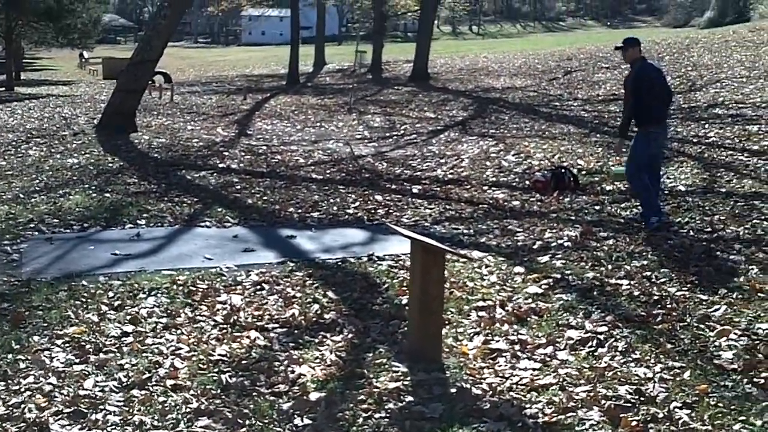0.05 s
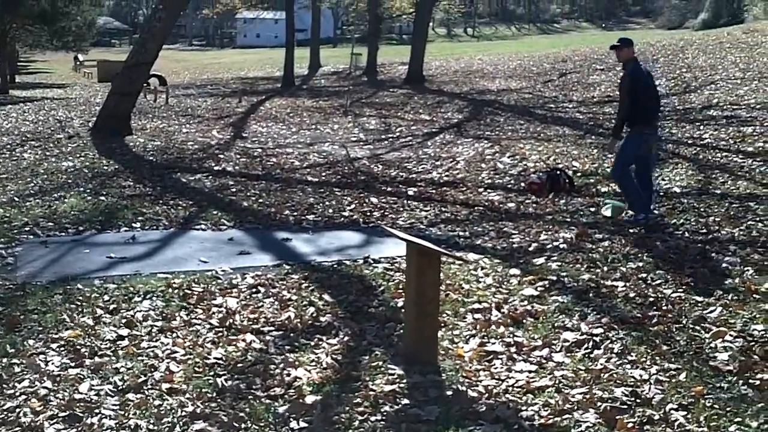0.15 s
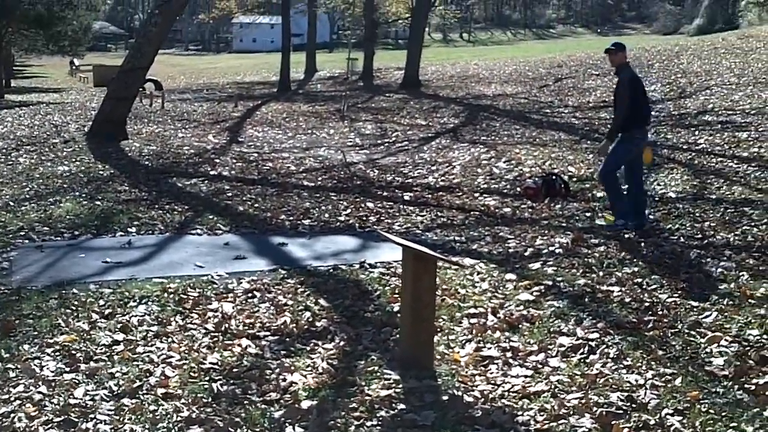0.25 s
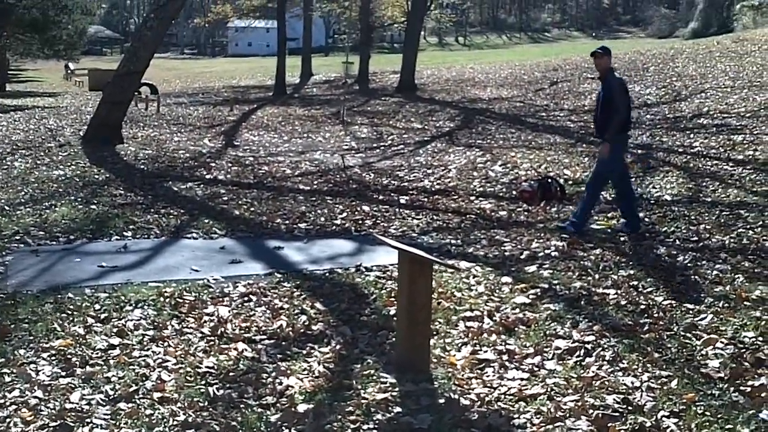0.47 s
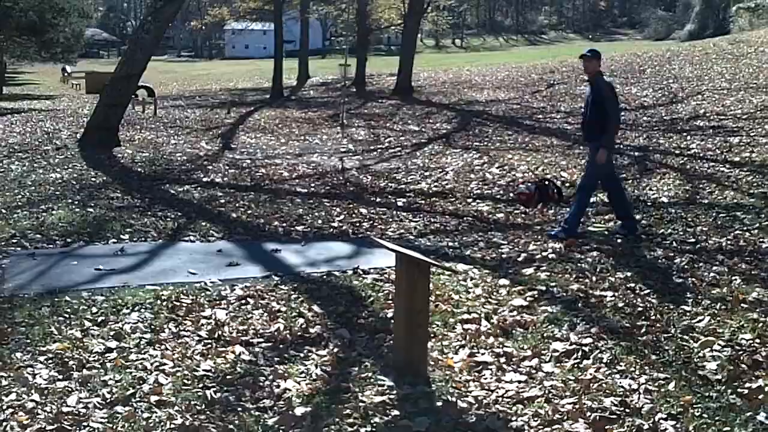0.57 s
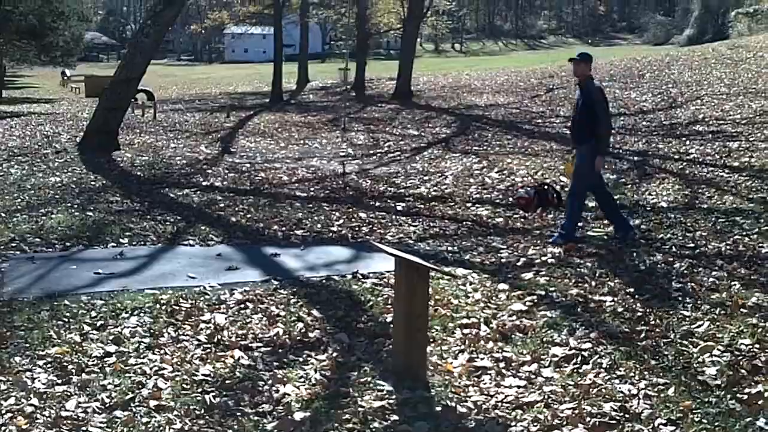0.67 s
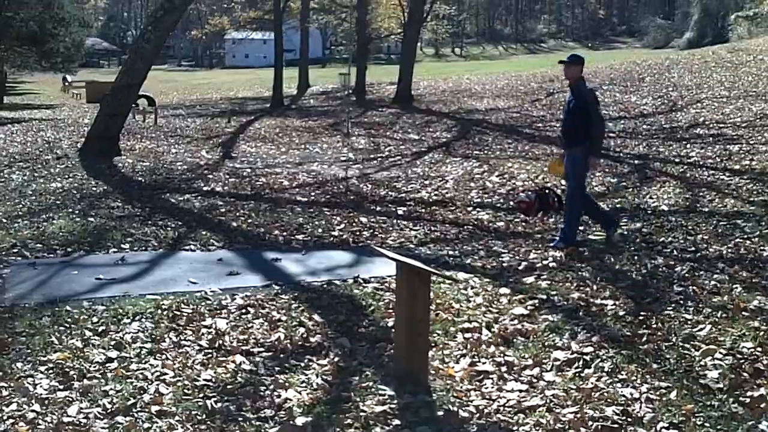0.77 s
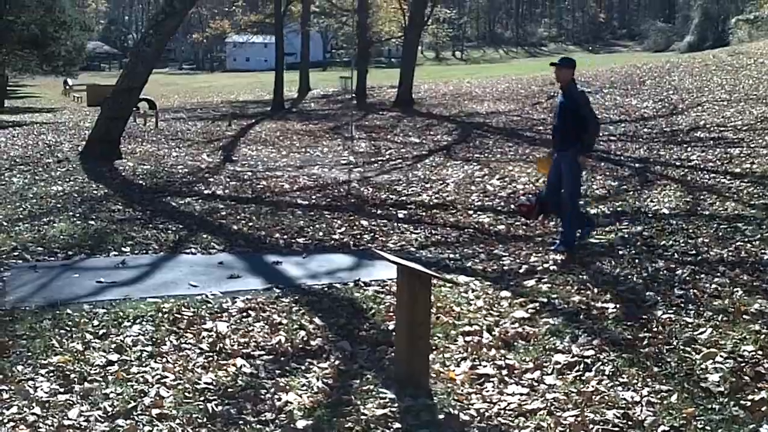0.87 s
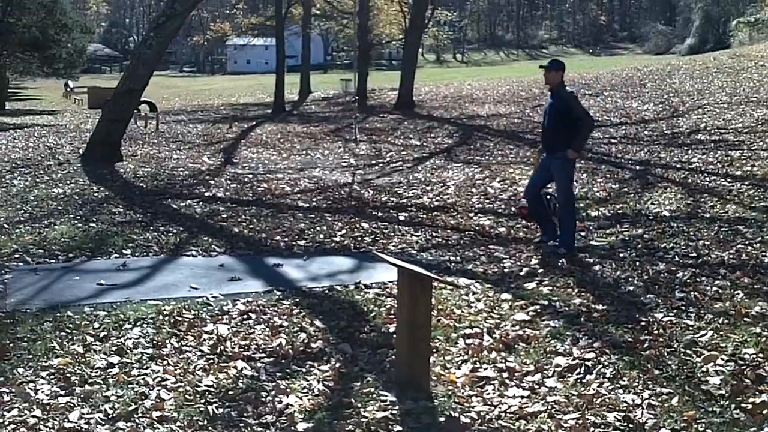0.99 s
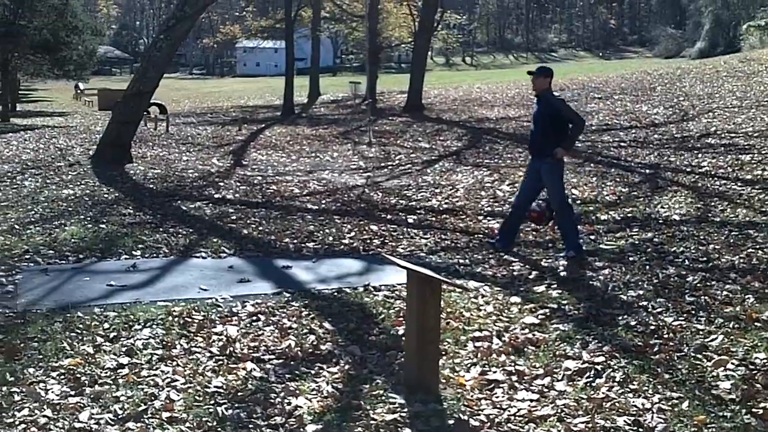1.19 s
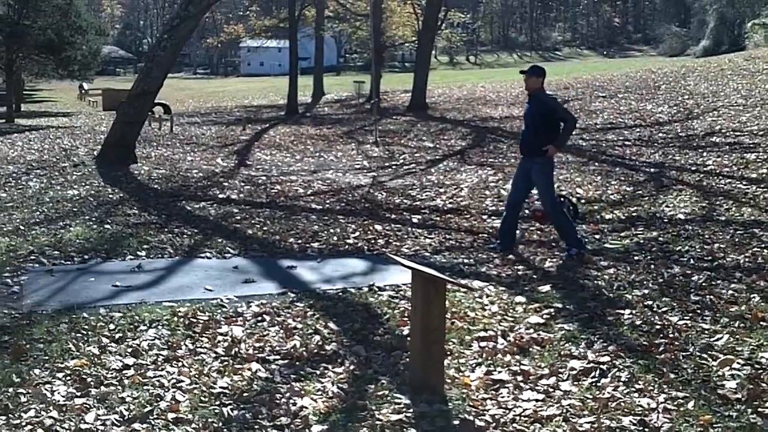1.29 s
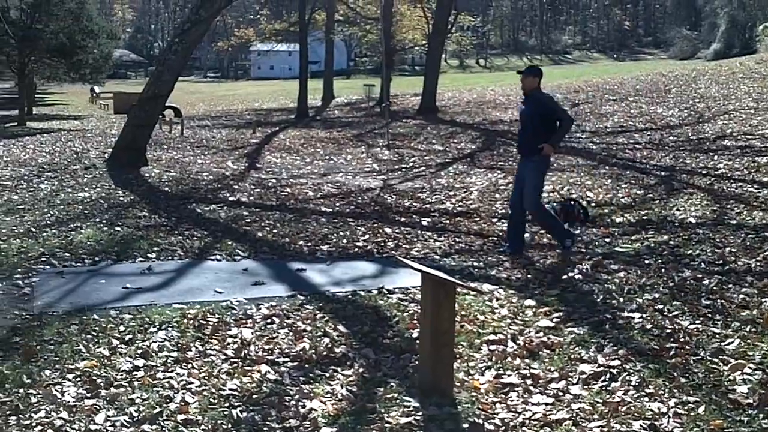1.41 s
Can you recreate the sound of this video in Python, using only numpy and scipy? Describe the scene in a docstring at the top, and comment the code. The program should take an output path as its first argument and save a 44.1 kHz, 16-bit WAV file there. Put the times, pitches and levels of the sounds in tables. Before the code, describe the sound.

One sharp knock on wood outdoors, followed by faint footsteps in dry leaves.

```python
"""Knock on wood in a park

A hard object hits wood: a graze, two sharp blows 10 ms apart, a short chatter, a soft last tap. Each contact
rings the wood's modes and adds a crack; the trees throw the sound back. Someone walks through dry leaves. Under
it all, the park hisses faintly and light wind rumbles on the microphone; the recorder cuts four narrow notches
into the treble."""
import sys
import numpy as np
from scipy import signal
from scipy.fft import rfft, irfft
from scipy.io import wavfile

SR = 44100
rng = np.random.default_rng(int(sys.argv[2]) if len(sys.argv) > 2 else 0)


def digitize_waveform(pressure):
    """Quantize a signal to 16-bit integers and store it at the path in sys.argv[1].

    Rows of a 2-D input are taken as channels; values are limited to [-1, 1].
    """
    field = np.atleast_2d(pressure).T
    bounded = np.clip(field, -1, 1)
    quanta = np.round(bounded * 32767).astype(np.int16)
    wavfile.write(sys.argv[1], SR, quanta)


N = 63945
T = np.arange(N) / SR


def from_db(db):
    """Decibels to gain."""
    return 10 ** (np.asarray(db) / 20)


def colour(x, spectrum):
    """Shape x by a spectrum of relative levels; rms 1."""
    hz, db = np.transpose(spectrum)
    bins_hz = np.maximum(np.arange(N // 2 + 1) * SR / N, 1)
    gain = from_db(np.interp(np.log(bins_hz), np.log(hz), db))
    shaped = irfft(rfft(x) * gain, N)
    return shaped / np.sqrt(np.mean(shaped ** 2))


def noise(spectrum):
    """Coloured noise, rms 1."""
    return colour(rng.standard_normal(N), spectrum)


def band(x, low_hz, high_hz):
    """Causal high-pass, then low-pass; both second order."""
    for hz, kind in (low_hz, "high"), (high_hz, "low"):
        x = signal.sosfilt(signal.butter(2, hz, kind, fs=SR, output="sos"), x + 1e-18)
    return x


def decay(start_s, t60_s):
    """Sudden onset, exponential decay."""
    return (T >= start_s) * np.exp(-np.log(1000) * np.maximum(T - start_s, 0) / t60_s)


def delayed(x, delay_s):
    """x, later by delay_s."""
    return np.interp(T - delay_s, T, x, left=0)


def swells(rows):
    """Envelope of asymmetric Gaussian bells, summed in power."""
    power = 0
    for peak_s, rise_s, fall_s, db in rows:
        width_s = np.where(T < peak_s, rise_s, fall_s)
        bell = from_db(db) * np.exp(-0.5 * ((T - peak_s) / width_s) ** 2)
        power += bell ** 2
    return np.sqrt(power)


# Park air spectrum: f/Hz, level/dB
AIR_SPECTRUM = [(100, 8), (250, 4.5), (450, -1), (1000, -2), (2000, -6.5), (3300, -8.5), (4600, -8),
                (6500, -16), (8000, -21.5), (10000, -24.5), (14000, -25.5), (16000, -18)]

def air(level_db=-57):
    """Steady far hiss of the park."""
    return from_db(level_db) * noise(AIR_SPECTRUM)


# Gust envelope: t/s, level/dB
GUSTS = [(0.0, -51), (0.024, -47.5), (0.666, -48), (0.746, -51), (0.782, -56), (0.984, -48), (1.054, -56.5),
         (1.106, -44.5), (1.194, -60.5), (1.324, -44), (1.396, -52.5), (1.45, -45)]
# Wind spectrum: f/Hz, level/dB
WIND_SPECTRUM = [(10, -1.5), (25, 6), (45, -2.5), (70, -3), (100, -12.5), (160, -40), (400, -56),
                 (2000, -83)]

def wind(gain_db=1):
    """Wind on the microphone: low rumble that follows the gusts."""
    gust_db = np.interp(T, *np.transpose(GUSTS))
    return from_db(gain_db + gust_db) * noise(WIND_SPECTRUM)


# Scuff swells: peak t/s, rise/s, fall/s, level/dB
SCUFFS = [(.328, 0.0074, 0.0078, -42), (.335, 0.00092, 0.0037, -36)]
# Scuff spectrum: f/Hz, level/dB
SCUFF_SPECTRUM = [(100, -14), (300, 8), (1500, 9.5), (4500, 9), (6700, 7), (8500, -3), (15000, -9)]

def graze():
    """The object scuffs along the wood before it bites."""
    return swells(SCUFFS) * noise(SCUFF_SPECTRUM)


# Contacts with the wood: t/s, gain/dB, low f/Hz, high f/Hz, relative crack level/dB
CONTACTS = [(0.3204, -11, 95, 624, -30), (.3260, -18.5, 303, 11000, -17.5), (.3362, -0.5, 204, 457, -31),
            (.3377, 1, 430, 11100, -21), (.3398, -25, 200, 2440, -36), (.3478, -0.5, 1000, 10000, -15),
            (0.3511, -12, 115, 3040, -28), (.3588, -17.5, 1220, 4440, -6.5), (.3627, -19, 90, 10000, -14),
            (.3640, -13, 750, 980, -16), (.3908, -7, 544, 620, -37)]
# Wood modes: f/Hz, level/dB, t60/s
WOOD_MODES = [(82, -22.5, 0.051), (171, -28, 0.063), (352, -38, 0.034), (627, -18.5, 0.022),
              (747, -21.5, 0.022), (779, -59.5, 1), (1300, -18, 0.018), (1560, -35.5, 0.046),
              (2040, -43, .018), (2650, -17, 0.0096), (3250, -20.5, 0.01), (3660, -20, 0.012),
              (4200, -31, .011), (4695, -29, 0.019), (6300, -40, 0.01)]
# Splintery crack spectrum: f/Hz, level/dB
CRACK_SPECTRUM = [(150, -34), (1000, -17.5), (2000, 2), (3300, 4), (4900, -5), (6500, -11), (9000, -20),
                  (15000, -15.5)]

def knock(crack_t60_s=0.018):
    """Each contact rings the same wood and adds a crack; each passes its own band, so some reach the high modes
    and others do not."""
    ring = sum(from_db(db) * decay(0, t60_s) * np.sin(2 * np.pi * hz * T)
               for hz, db, t60_s in WOOD_MODES)
    blows = np.zeros(N)
    for start_s, db, low_hz, high_hz, crack_db in CONTACTS:
        crack = from_db(crack_db) * decay(0, crack_t60_s) * noise(CRACK_SPECTRUM)
        blows += from_db(db) * delayed(band(ring + crack, low_hz, high_hz), start_s)
    return blows


# Trunk reflections: delay/s, gain/dB, low f/Hz, high f/Hz
ECHOES = [(0.0369, -29, 930, 8000), (.0475, -27, 79, 7000), (0.093, -23, 1100, 3000),
          (0.156, -24, 700, 1310)]

def trunk_echoes(hit):
    """Nearby trunks each return one dull copy of the hit."""
    return sum(from_db(db) * delayed(band(hit, low_hz, high_hz), delay_s)
               for delay_s, db, low_hz, high_hz in ECHOES)


# Tree scatter spectrum: f/Hz, level/dB
SCATTER_SPECTRUM = [(120, -11), (350, 1.5), (560, 1.5), (680, 7.5), (780, 8.5), (920, -5), (1300, 3.5),
                    (1850, 3), (2600, -6.5), (3600, -3.5), (4900, -7.5), (7000, -19), (14000, -37)]

def tree_scatter(gain_db=-40, start_s=0.3738, rise_s=0.019, t60_s=0.66):
    """Diffuse return from the woods: a noise tail that builds fast and dies away."""
    build = 1 - np.exp(-np.maximum(T - start_s, 0) / rise_s)
    return from_db(gain_db) * build * decay(start_s, t60_s) * noise(SCATTER_SPECTRUM)


# Sole pressure swells: peak t/s, rise/s, fall/s, level/dB
TREADS = [(.65, 0.068, 0.054, -57.5), (.77, 0.029, 0.014, -65), (1.17, 0.025, 0.027, -62.5),
          (1.27, 0.023, 0.12, -61.5), (1.385, 0.013, 0.022, -55)]
# Sole spectrum: f/Hz, level/dB
SOLE_SPECTRUM = [(100, -14), (280, -2.5), (500, -2.5), (1500, 3.5), (2400, -0.5), (5000, -14), (15000, -34)]
# Thud swell: peak t/s, rise/s, fall/s, level/dB
THUDS = [(.78, 0.052, 0.044, -55.5)]
# Ground spectrum: f/Hz, level/dB
GROUND_SPECTRUM = [(120, 1), (220, -9.5), (285, 9.5), (350, -31), (600, -4), (1200, -28), (5000, -54)]

def soles():
    """Soles press dully on the ground; one step adds a faint low thud."""
    press = swells(TREADS) * noise(SOLE_SPECTRUM)
    thud = swells(THUDS) * noise(GROUND_SPECTRUM)
    return press + thud


# Rustle swells: peak t/s, rise/s, fall/s, level/dB
RUSTLES = [(.615, 0.026, 0.054, -55.5), (.765, 0.042, .012, -56.5), (.955, .03, 0.033, -64),
           (1.185, 0.036, .025, -55), (1.265, 0.048, 0.039, -46), (1.395, 0.038, 0.02, -50)]
# Crushed leaf spectrum: f/Hz, level/dB
LEAF_SPECTRUM = [(300, -28), (1000, -8.5), (2200, -10.5), (3300, 1.5), (4500, 3.5), (6500, -1), (8500, -9),
                 (10200, -10.5), (12000, -19.5), (15000, -17.5)]

def leaf_rustle(crackles_per_s=7100, spread_db=4):
    """Dry leaves crush underfoot: dense impulses of random size and sign."""
    sizes = from_db(spread_db * np.minimum(rng.exponential(1, N), 4))
    signs = rng.choice([-1, 1], N)
    fires = rng.random(N) < crackles_per_s / SR
    return swells(RUSTLES) * colour(sizes * signs * fires, LEAF_SPECTRUM)


# Leaf and twig snaps: t/s, level/dB, tick share/0-1
SNAPS = [(0.6256, -37.5, 0.84), (.7755, -46.5, 0), (.863, -55, 0.2), (.933, -58, 0), (0.966, -49, .05),
         (1.154, -48, 0.95), (1.164, -45, 0.2), (1.1858, -37.5, 0.1), (1.23, -39, 0), (1.24, -43, 0.2),
         (1.2578, -45, 0.16), (1.2653, -35, 0.1), (1.2754, -48, .05), (1.339, -45, 0.8)]
# Thin tick spectrum: f/Hz, level/dB
TICK_SPECTRUM = [(500, 6), (2000, 3), (5000, 0), (9000, -2), (15000, -16)]

def snaps(t60_s=0.018):
    """Single leaves and twigs break: short bursts, each a blend of leaf noise and tick."""
    leaf, tick = noise(LEAF_SPECTRUM), noise(TICK_SPECTRUM)
    return sum(from_db(db) * decay(start_s, t60_s) * ((1 - share) * leaf + share * tick)
               for start_s, db, share in SNAPS)


def scene():
    """Air, wind, knock, its return from the trees and footsteps; mono."""
    background = air() + wind()
    hit = graze() + knock()
    trees = trunk_echoes(hit) + tree_scatter()
    footsteps = soles() + leaf_rustle() + snaps()
    return (background + hit + trees + footsteps)[None]


# Recorder notches: f/Hz, width/Hz
NOTCHES = [(2720, 730), (5500, 1350), (7820, 1930), (10950, 1070)]
CUTOFF_HZ = 15250

def record(dry):
    """Recorder: four treble notches against motor noise, then a steep low-pass."""
    for hz, width_hz in NOTCHES:
        dry = signal.lfilter(*signal.iirnotch(hz, hz / width_hz, fs=SR), dry)
    low_pass = signal.ellip(10, rp=0.2, rs=70, Wn=CUTOFF_HZ, fs=SR, output="sos")
    return signal.sosfilt(low_pass, dry)


dry = scene()
out = record(dry)
digitize_waveform(out)
```